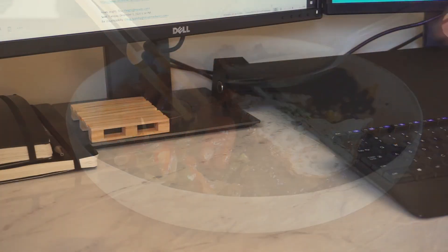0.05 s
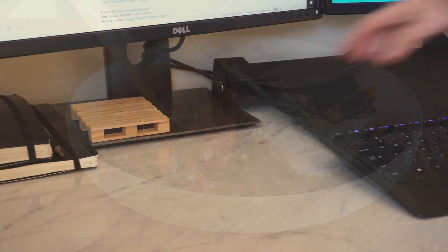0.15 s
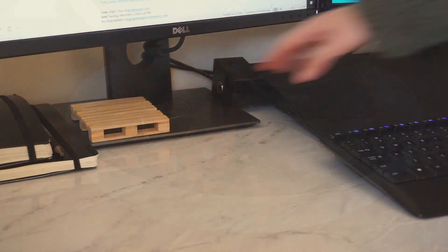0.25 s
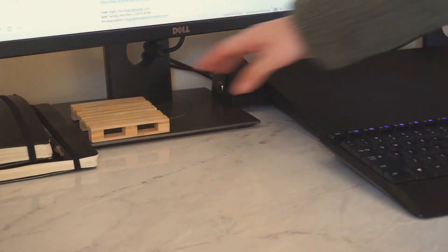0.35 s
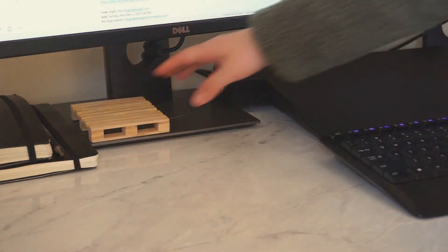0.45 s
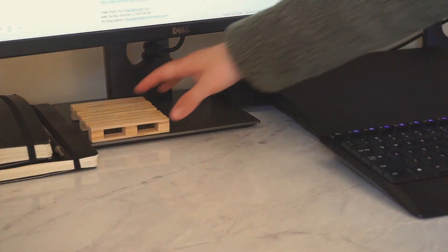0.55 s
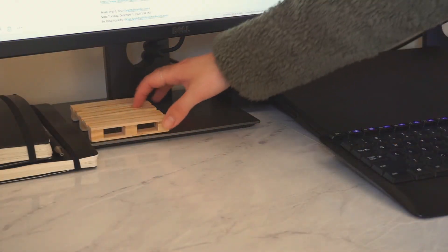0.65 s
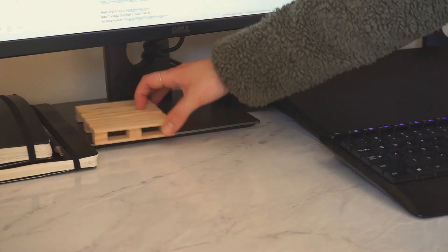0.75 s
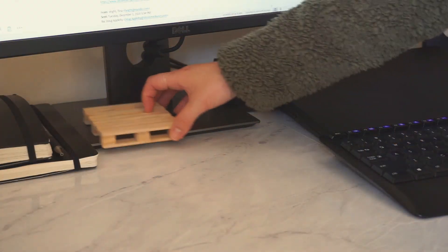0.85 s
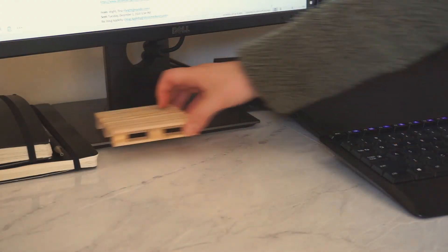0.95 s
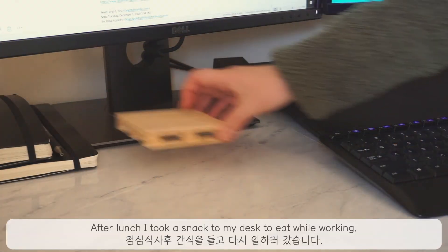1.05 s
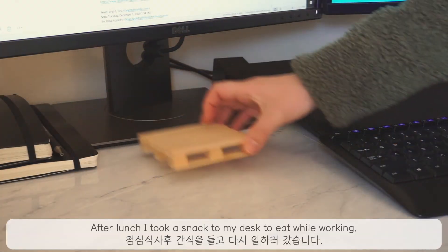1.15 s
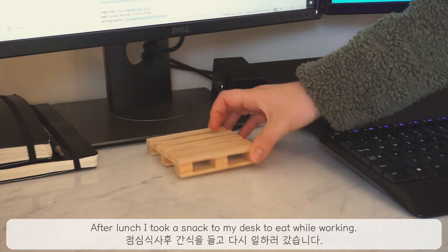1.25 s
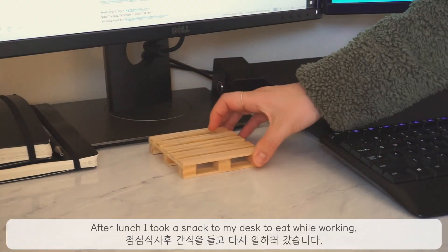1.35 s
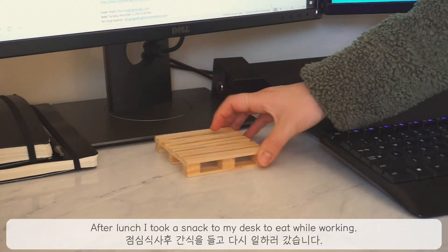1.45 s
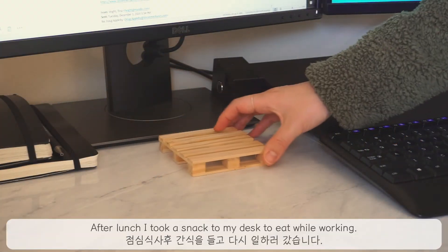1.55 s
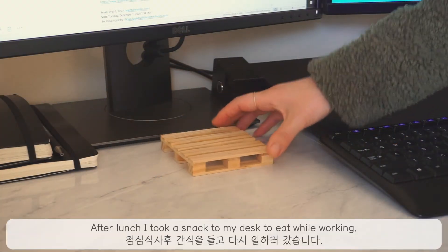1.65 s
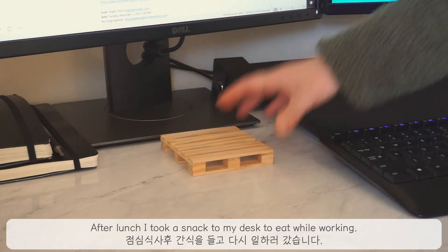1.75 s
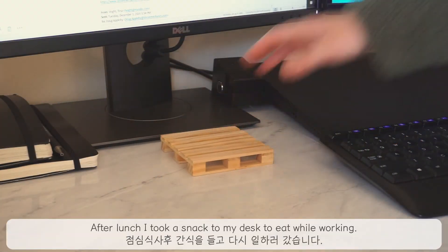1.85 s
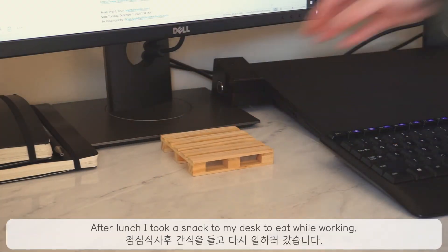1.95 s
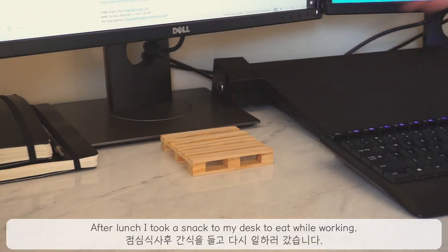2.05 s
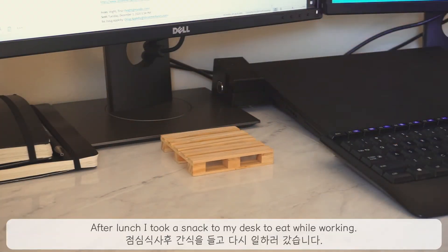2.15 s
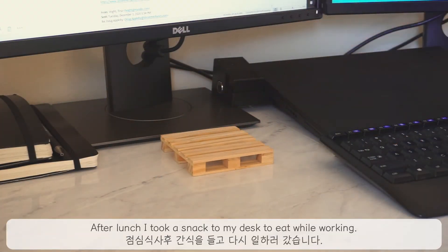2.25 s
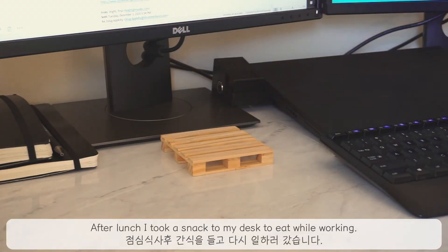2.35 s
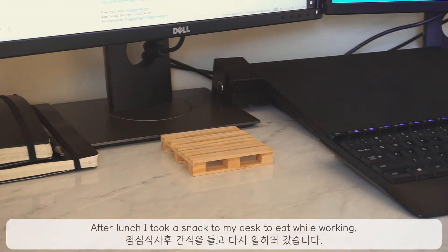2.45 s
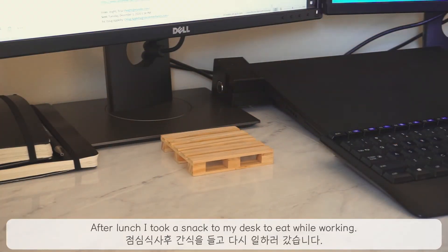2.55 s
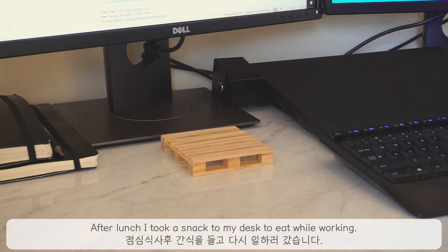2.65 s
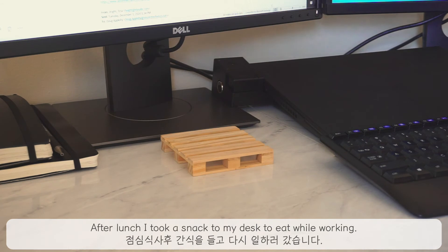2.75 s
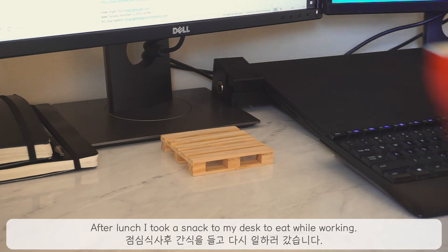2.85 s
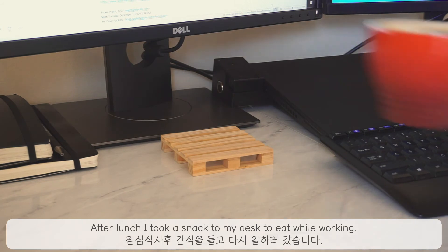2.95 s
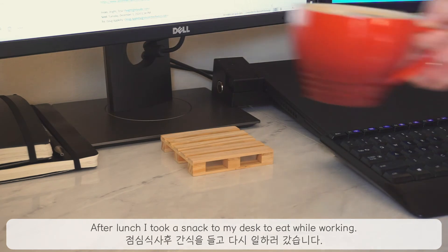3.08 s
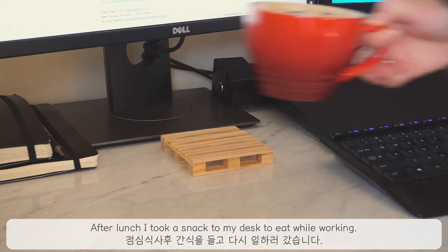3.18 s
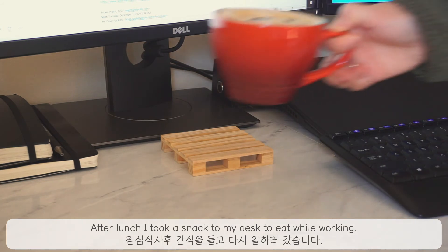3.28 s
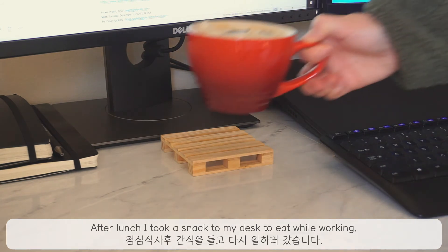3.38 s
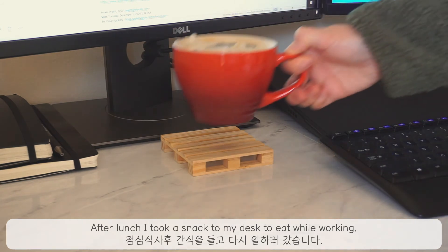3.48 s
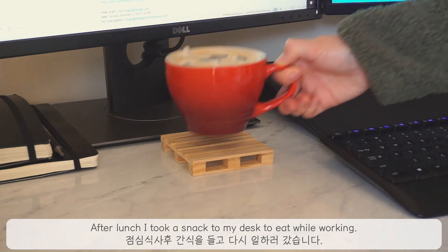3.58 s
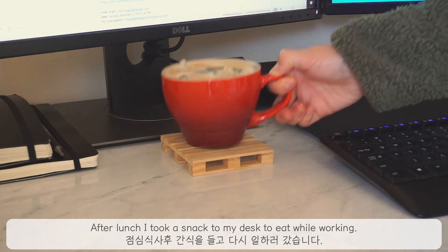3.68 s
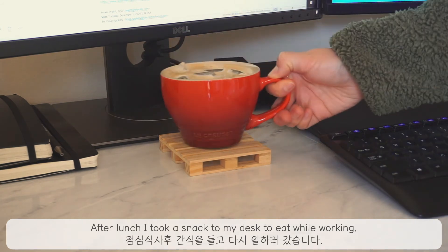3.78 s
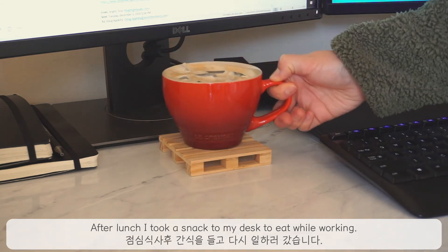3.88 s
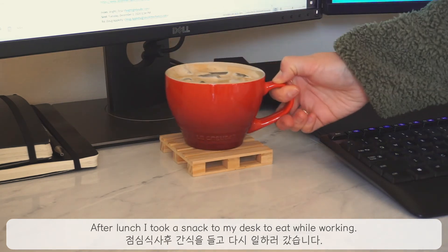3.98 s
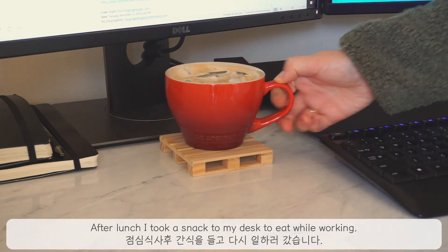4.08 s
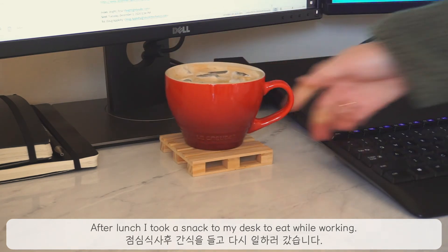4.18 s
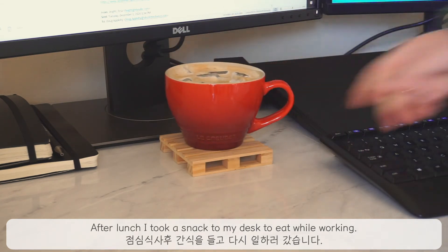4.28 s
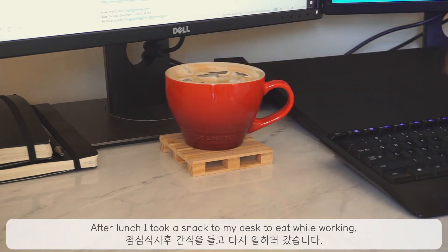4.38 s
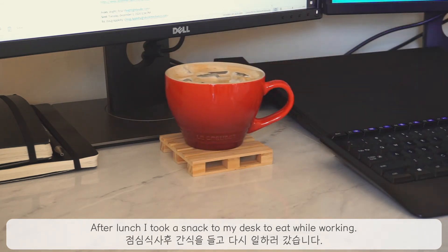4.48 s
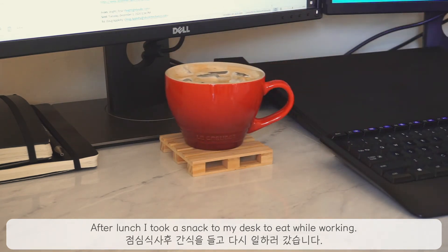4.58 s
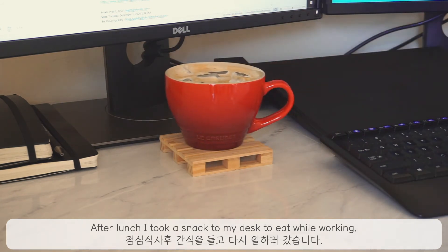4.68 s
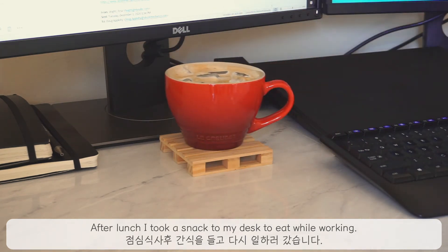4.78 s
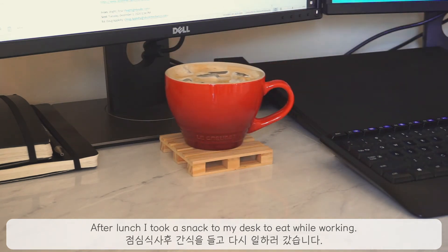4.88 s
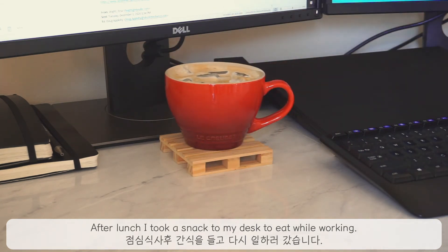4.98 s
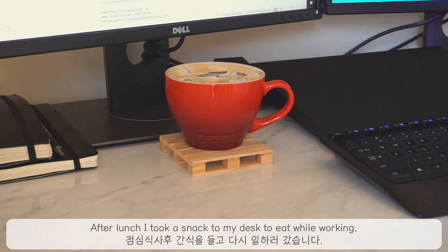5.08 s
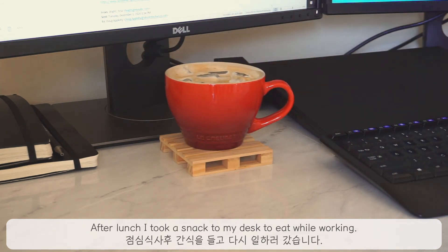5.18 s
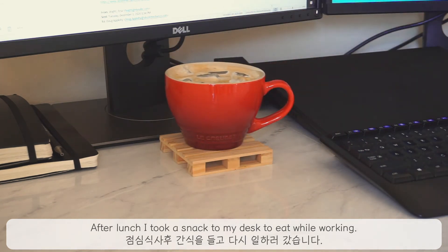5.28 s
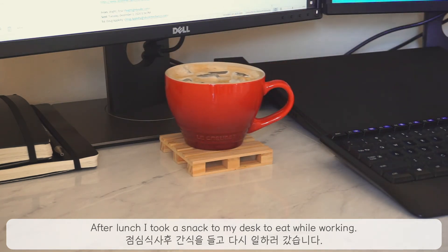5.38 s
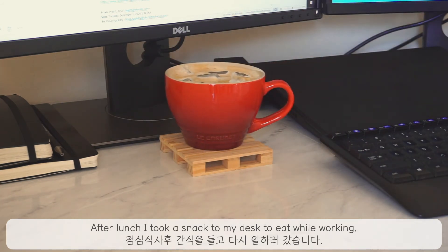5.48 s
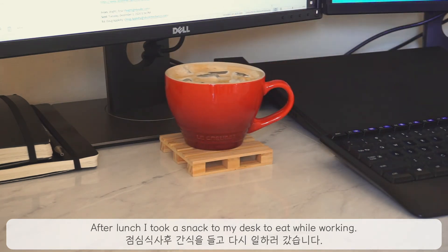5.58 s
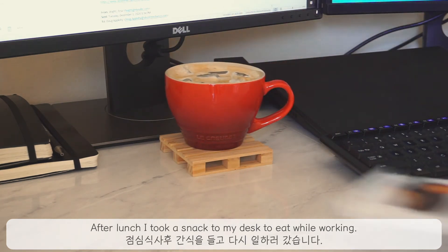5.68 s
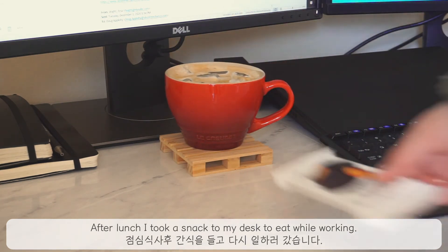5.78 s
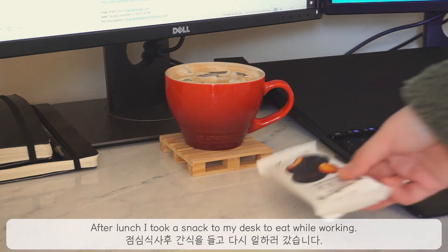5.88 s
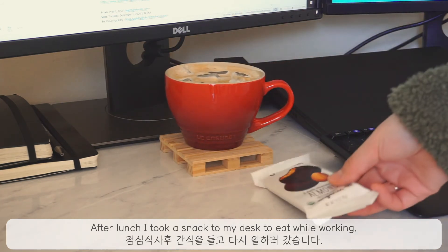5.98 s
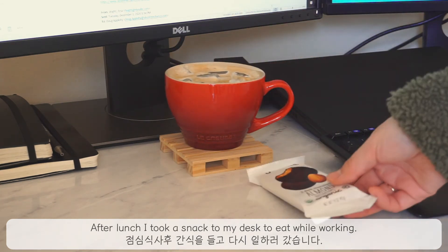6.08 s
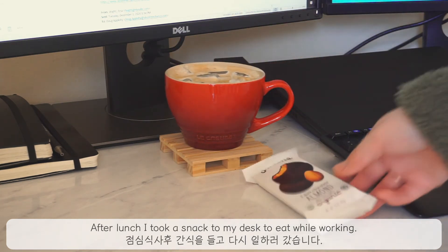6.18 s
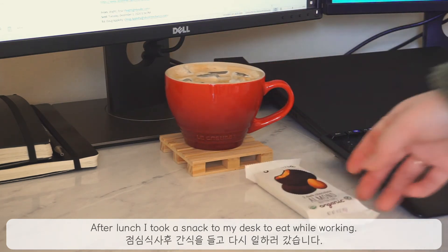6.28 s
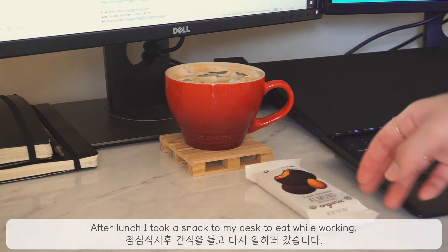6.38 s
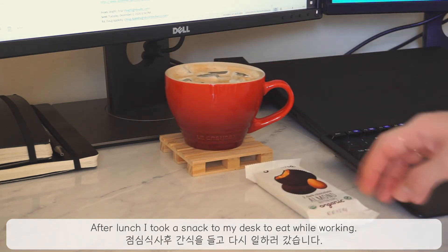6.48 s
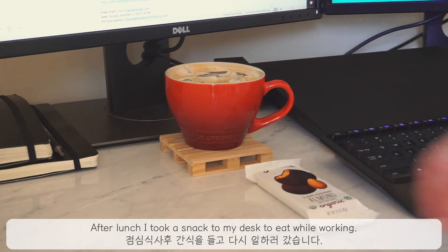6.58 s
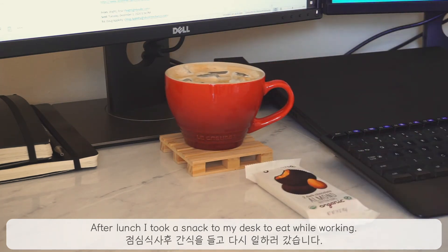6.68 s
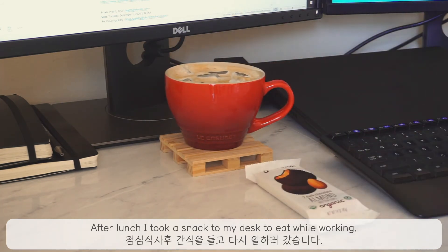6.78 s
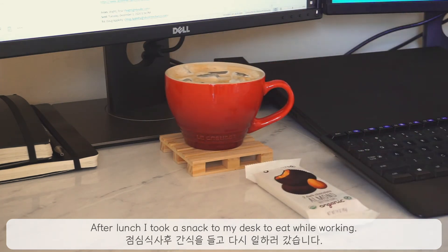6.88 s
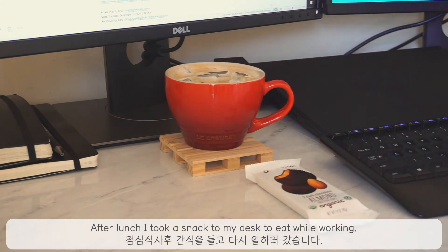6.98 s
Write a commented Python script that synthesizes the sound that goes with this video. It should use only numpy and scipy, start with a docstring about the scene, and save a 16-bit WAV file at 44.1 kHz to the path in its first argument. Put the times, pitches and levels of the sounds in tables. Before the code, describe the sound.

A small wooden coaster judders and scrapes off a monitor stand, then taps lightly down on a desk. After a pause with faint sleeve swishes, a full ceramic mug lands on it with a loud clack and a low boom from the desk top. A plastic snack wrapper crackles further off, comes close and drops with a soft thump. The stereo microphone is close, in a quiet room with low room tone.

```python
"""Coaster, mug and snack on a desk

Quiet room, stereo microphone close to the desk. Left of centre a small wooden coaster sticks and slips
off a monitor stand and is laid down. A full ceramic mug lands on it with a clack, and the desk top booms.
A snack is picked up further off, the creases of its plastic wrapper snapping; it comes close and is
dropped beside the mug. Underneath are low room tone and the swish of a fleece sleeve."""
import sys
import numpy as np
from scipy import signal
from scipy.fft import rfft, irfft
from scipy.io import wavfile

SR = 44100
rng = np.random.default_rng(int(sys.argv[2]) if len(sys.argv) > 2 else 0)


def int16_out(signal):
    """Quantize to a 16-bit WAV file."""
    q = np.round(np.clip(np.atleast_2d(signal).T, -1, 1) * 32767)
    wavfile.write(sys.argv[1], SR, q.astype(np.int16))


N = 310464
TIME = np.arange(N) / SR

# Levels are relative: each source has a gain of its own in the mix.
# contacts: t/s, level/dB, brightness/Hz, chatter/s
MUG_CLACKS = [(3.7385, -45, 2500, 0.008), (3.7425, -24, 9000, 0.0037), (3.7436, -17, 4000, 0.0013),
              (3.7465, -22.5, 1500, 0.0037)]  # the foot grazes, then meets the coaster
STAND_KNOCKS = [(0.7862, -17.5, 9000, 0.0092), (0.7905, -24.5, 1200, 0.01), (0.8165, -28.5, 1400, 0.0071),
                (0.8240, -27.5, 1000, 0.011), (0.9185, -35.5, 900, 0.019), (0.9480, -37, 600, 0.017)]  # coaster knocking on the stand
DESK_TAPS = [(1.2368, -34.5, 3000, 0.0022), (1.3365, -33.5, 3500, 0.0047), (1.3420, -39.5, 1600, 0.03)]  # coaster touching down
# weight arriving on the desk top: t/s, level/dB, contact/s, share of the full ringing time
DESK_THUMPS = [(0.7880, -22, 0.0018, 0.18), (1.3356, -28.5, 0.0018, 0.42), (2.435, -26.5, 0.0024, 0.84),
               (3.744, 3.5, 0.0034, 1), (3.9830, -18, 0.0022, 0.29), (4.242, -24.5, 0.0041, 0.43),
               (6.245, -20, 0.0012, 0.19), (6.302, -17, 0.00078, 0.3)]
# creases snapping and jolting the snack: t/s, snap level/dB, pitch/Hz, chatter/s, jolt level/dB
CREASE_SNAPS = [(4.252, -42, 3100, 0.0074, -65), (4.903, -37, 3800, 0.065, -45.5),
                (4.9740, -44.5, 2350, 0.036, -56), (5.3440, -49, 2300, 0.025, -58),
                (5.389, -25.5, 3400, 0.0082, -42.5), (5.6338, -35.5, 8500, 0.0045, -65),
                (5.7510, -43.5, 3100, 0.0084, -56), (5.7960, -53, 3520, 0.023, -40),
                (5.9786, -27.5, 3150, 0.005, -43), (5.9950, -12.5, 5350, 0.0028, -28),
                (6.1711, -20.5, 3700, 0.0061, -36), (6.2424, -25.5, 2780, 0.013, -45),
                (6.2980, -31.5, 3100, 0.015, -37.5), (6.3377, -36.5, 2900, 0.0046, -47)]

# resonances: f/Hz, width/Hz, level/dB
MUG_MODES = [(345, 130, -3), (694, 460, -6.5), (1040, 560, -2.5), (1780, 710, -1), (2520, 630, 2),
             (2800, 190, -16), (3750, 320, -11), (4720, 770, -5.5), (4930, 220, 2.5), (7100, 6000, -12)]
STAND_MODES = [(780, 63, -10), (947, 88, -2.5), (1030, 79, 4), (1214, 120, -5.5), (1516, 24, -4),
               (1730, 150, -9), (2040, 51, -9.5), (2410, 60, -13), (3100, 130, -17), (4700, 300, -22)]
COASTER_MODES = [(158, 74, 2), (360, 110, -4), (600, 57, 6), (760, 47, 2), (995, 113, 5), (1715, 270, 5),
                 (2440, 460, -1.5), (3360, 600, -6), (4700, 410, 0), (8500, 10000, -16.5)]
LAID_COASTER_MODES = [(130, 43, 3), (355, 26, 15), (548, 36, 2.5), (714, 100, 2), (1130, 140, 3.5),
                      (1590, 320, 1.5), (2300, 500, -4), (6630, 8300, -10)]  # resting on the desk
SNACK_MODES = [(178, 83, -10), (363, 280, -11), (576, 250, -1), (814, 96, 0.5), (1144, 110, 4),
               (1420, 260, -2)]
# ringing of the desk top: f/Hz, level/dB, t60/s
DESK_MODES = [(77, -44.5, 0.97), (93, -58, 0.45), (124.54, -21, 0.56), (130, -72, 0.095),
              (138.2, -28, 0.46), (155.7, -31.5, 0.33), (202, -45.5, 0.95), (249.3, -46.5, 1),
              (350, -37.5, 0.38), (374, -29.5, 0.23), (472, -32.5, 0.68)]
# resonances of a crease: multiple of its pitch, width as a share of the frequency, level/dB
CREASE_MODES = [(.3, 0.23, -1), (.66, 0.4, 0.5), (1, 0.25, 3), (1.3, 0.31, -0.5), (1.9, .35, -3.5),
                (2.8, 1, -7.5)]

# hand and arm movements: peak t/s, level/dB, rise/s, fall/s
COASTER_PULLS = [(0.69, -46.5, 0.0083, 0.021), (0.768, -43.5, 0.031, 0.053), (0.882, -41, 0.043, 0.073)]  # wood sliding over the stand
WRAPPER_RUBS = [(4.245, -52.5, 0.008, 0.012), (5.60, -55, 0.038, 0.018), (5.71, -55.5, 0.012, 0.019),
                (5.808, -49, 0.025, 0.017), (6.047, -45, 0.015, 0.015), (6.217, -38, 0.014, 0.015),
                (6.288, -41.5, 0.03, 0.024)]  # on fingers and desk
SLEEVE_SWISHES = [(0.32, -61.5, 0.35, 0.57), (1.05, -63.5, 0.32, 0.68), (2.38, -60.5, 0.24, 0.22),
                  (2.93, -58.5, 0.13, 0.073)]
SLEEVE_BRUSHES = [(0.28, -63, 0.35, 0.4), (2.32, -63, 0.22, 0.21), (2.84, -55.5, 0.071, 0.19),
                  (2.978, -51, 0.04, 0.057)]  # fleece against itself

# noise spectra: f/Hz, level/dB
SCRAPE_SPECTRUM = [(100, -27), (500, -2), (1000, 3), (2000, 1.5), (3200, -3), (5000, -1), (7500, -4.5),
                   (11000, -1.5)]
RUSTLE_SPECTRUM = [(200, -9), (1000, -13.5), (2000, -4.5), (3500, -5), (5500, -7), (8000, -9.5),
                   (11000, -8.5)]
SWISH_SPECTRUM = [(120, -3), (300, 0), (550, 2), (900, -2), (2000, -8.5), (5000, -21), (11000, -32)]
BRUSH_SPECTRUM = [(150, -6), (1800, 0.5), (2450, 4), (3200, -1), (7000, -3), (11000, -3)]
ROOM_TONE_SPECTRUM = [(11, -19), (18, -4.5), (59, -1.5), (93, -13), (124, -10.5), (146, -19), (278, -18),
                      (374, -19.5), (405, -22.5), (559, -19), (931, -24.5), (1250, -24), (1360, -25),
                      (7760, -33.5), (11000, -34.5), (14300, -141), (22000, -120)]
# room echo: f/Hz, level/dB, t60/s
ECHO_BANDS = [(94, -6.5, 0.9), (300, 9.5, 0.37), (696, 2, 0.56), (2000, -1.5, 0.4), (5000, 0, 0.46),
              (11100, -9, 0.85)]
# left-right correlation of the echo and of the background: f/Hz, correlation (-1..1)
ECHO_CORRELATION = [(130, 0.88), (300, 0.58), (600, 0.61), (1100, 0.0083), (2000, 0.16), (5000, 0),
                    (11000, 0.34)]
AIR_CORRELATION = [(40, 1), (130, 0.85), (280, 0.14), (550, -0.15), (1000, -0.44), (2000, -0.34),
                   (5000, -0.14), (11000, 0.034)]


def mug(echo):
    """Close, a little left: the full mug clacks, then rocks to rest, each time softer and duller."""
    start_s, gap_s, chatter_s = 3.784, 0.098, 0.036
    first_db, loss_db, bright_hz, dulling = -35, 8, 14000, 0.6
    rocks = [(start_s + k * gap_s, first_db - k * loss_db, bright_hz * dulling ** k, chatter_s)
             for k in range(3)]
    contacts = strikes(MUG_CLACKS + rocks, MUG_MODES, chatter=1, spot_db=2)
    return place(amp(4.5) * contacts, echo, pan_db=3.5, side_db=-6, room_db=-2)


def desk(echo):
    """Centre, nearly dry: half-sine pushes ring the desk top; the heavy mug makes it boom longest."""
    t, out = TIME[:SR], np.zeros(N)
    choke = amp(-130 * np.maximum(t - 0.24, 0))  # friction stops the last faint swings
    for s, db, contact_s, share in DESK_THUMPS:
        push = np.sin(np.pi * np.minimum(t / contact_s, 1))
        ring = sum(amp(level - 60 * t / (t60 * share)) * np.sin(2 * np.pi * hz * t)
                   for hz, level, t60 in DESK_MODES)
        add(out, s, amp(db) * signal.fftconvolve(push / push.sum(), ring * choke))
    low_cut = signal.butter(2, 62, "high", fs=SR, output="sos")  # a board radiates no slow motion
    return place(signal.sosfilt(low_cut, out), echo, pan_db=-0.2, side_db=-20, room_db=-13)


def coaster(echo):
    """On the left: the wood judders, slides off the stand and is laid on the desk."""
    lift_off_s, fade_s = 0.96, 0.005
    judder = strikes(slips(), STAND_MODES, chatter=0.45, spot_db=2)
    touching = np.exp(-np.maximum(TIME - lift_off_s, 0) / fade_s)
    slide = strokes(COASTER_PULLS) * touching * grains(SCRAPE_SPECTRUM, per_s=6200, spread_db=3)
    knocks = strikes(STAND_KNOCKS, COASTER_MODES, chatter=0.9, spot_db=1.7)
    taps = strikes(DESK_TAPS, LAID_COASTER_MODES, chatter=0.43, spot_db=2.5)
    return (place(amp(-3.5) * judder, echo, pan_db=7, side_db=-1, room_db=-1)
            + place(amp(1) * (slide + knocks + taps), echo, pan_db=5, side_db=-7, room_db=-4.5))


def slips(count=9):
    """Stick-slip contacts, nearly regular, that dull as the wood moves and weaken as it breaks free."""
    start_s, gap_s, jitter_s, chatter_s = 0.6845, 0.0085, 0.00131, 0.007
    grip_db, loss_db, spread_db = -23, 11, 1.5
    grip_s, release_s, bright_hz, dulling_s = 0.035, 0.012, 3800, 0.018
    rows = []
    for k, (late, strong) in enumerate(rng.standard_normal((count, 2))):
        age = k * gap_s
        free = np.clip((age - grip_s) / release_s, 0, 1)
        db = grip_db - loss_db * free + spread_db * strong
        rows.append((start_s + age + jitter_s * late, db, bright_hz / (1 + age / dulling_s), chatter_s))
    return rows


def snack(echo):
    """The wrapper crackles and jolts the snack, first further off with more room, then close by."""
    jolt_cycles, jolt_chatter_s = 8.6, 0.009  # a briefer snap gives a brighter jolt
    jolts = [(s, db, jolt_cycles / snap_s, jolt_chatter_s) for s, _, _, snap_s, db in CREASE_SNAPS]
    crackle = amp(2) * crinkles(bright_hz=13900, chatter=1.72)
    rattle = amp(-1.5) * strikes(jolts, SNACK_MODES, chatter=1, spot_db=3)
    sound = crackle + rattle + rustle()
    close = np.interp(TIME, [5.85, 5.95], [0, 1])
    return (place(sound * (1 - close), echo, pan_db=-0.5, side_db=0, room_db=-1.5)
            + place(amp(-0.5) * sound * close, echo, pan_db=3, side_db=-4.5, room_db=-5))


def crinkles(bright_hz, chatter):
    """Each crease has a size, and so a pitch; it buckles, then springs back softer and lower."""
    rebound_s, rebound_loss_db, rebound_ratio = 0.0097, 11.5, 0.83
    out = np.zeros(N)
    for s, db, pitch, chatter_s, _ in CREASE_SNAPS:
        for delay, loss_db, hz in ((0, 0, pitch), (rebound_s, rebound_loss_db, pitch * rebound_ratio)):
            modes = [(k * hz, k * hz * width, level)
                     for k, width, level in CREASE_MODES if k * hz < SR / 2]
            add(out, s + delay, strike(db - loss_db, bright_hz, chatter_s, modes, chatter))
    return out


def rustle():
    """The wrapper rustles finely as it is held and rubbed, bends before each snap and settles after."""
    from_s, until_s, far_db, near_db = 4.9, 6.33, -65.5, -61.5
    bend_s, settle_s, flex_db, snap_share = 0.0084, 0.057, -38.5, 0.47
    in_hand = (TIME > from_s) & (TIME < until_s)
    held = amp(np.interp(TIME, [from_s, until_s], [far_db, near_db])) * in_hand
    gains = [held, strokes(WRAPPER_RUBS)]
    for s, db, *_ in CREASE_SNAPS:
        flex = np.exp(-np.abs(TIME - s) / np.where(TIME < s, bend_s, settle_s))
        gains.append(amp(flex_db + snap_share * db) * flex)
    return np.linalg.norm(gains, axis=0) * grains(RUSTLE_SPECTRUM, per_s=4000, spread_db=2)


def sleeve():
    """Faint and wide: fleece swishes as the arm moves and brushes against itself."""
    swish = coloured(diffuse(N, AIR_CORRELATION), SWISH_SPECTRUM)
    brush = coloured(diffuse(N, AIR_CORRELATION), BRUSH_SPECTRUM)
    return strokes(SLEEVE_SWISHES) * swish + strokes(SLEEVE_BRUSHES) * brush


def room_tone():
    """Steady low rumble and hiss from all round the microphone."""
    return amp(-55.51) * coloured(diffuse(N, AIR_CORRELATION), ROOM_TONE_SPECTRUM)


def room_echo(build_s):
    """The room's diffuse echo builds quickly and dies at its own rate in each octave."""
    size = 2 ** 15
    t, hz = TIME[:size], np.fft.rfftfreq(size, 1 / SR)
    noise, out = rfft(diffuse(size, ECHO_CORRELATION)), 0
    for centre in 62.5 * 2 ** np.arange(9):
        share = np.maximum(1 - np.abs(np.log2(np.maximum(hz, 1) / centre)), 0)
        band = amp(at_hz(ECHO_BANDS, centre)) * irfft(noise * share, size)
        t60 = at_hz(ECHO_BANDS, centre, column=2)
        decay = amp(-60 * t / t60) * (1 - np.exp(-t / build_s))
        out = out + band * decay / np.linalg.norm(decay)
    return out


def place(x, echo, pan_db, side_db, room_db, scatter_s=0.002):
    """At the microphone: direct sound, treble scattered sideways by things on the desk, and the room."""
    t = TIME[:echo.shape[1]]
    burst = rfft(rng.standard_normal(len(t)) * np.exp(-t / scatter_s))
    smear = irfft(burst / np.abs(burst), len(t)) * (t < 10 * scatter_s)  # spread in time, uncoloured
    scatter = signal.lfilter(*signal.butter(1, 1500, "high", fs=SR), smear)
    pan = amp([[pan_db / 2], [-pan_db / 2]])  # positive is left
    paths = amp(side_db) * scatter * [[1], [-1]] + amp(room_db) * echo * np.sqrt(pan)
    direct = np.array([np.roll(x, 1), x])  # the right capsule is a little nearer
    return direct * pan + signal.fftconvolve(x[None], paths, axes=1)[:, :N]


def strikes(events, modes, chatter, spot_db):
    """Each contact meets the body at another spot and shares its force differently among the modes."""
    out = np.zeros(N)
    for s, db, bright_hz, chatter_s in events:
        excited = [(hz, width, level + spot_db * rng.standard_normal()) for hz, width, level in modes]
        add(out, s, strike(db, bright_hz, chatter_s, excited, chatter))
    return out


def strike(db, bright_hz, chatter_s, modes, chatter):
    """A pulse and a dying spray of micro-contacts, dulled by the contact's softness, ring a body."""
    t = TIME[:SR // 8]
    pulse = 1. * (t == 0)
    spray = rng.standard_normal(len(t)) * rng.exponential(1, len(t)) * np.exp(-2 * t / chatter_s)
    contact = pulse + chatter * spray * np.sqrt(1000 / SR)
    pole = np.exp(-2 * np.pi * bright_hz / SR)
    sound = resonate(signal.lfilter([1 - pole], [1, -pole], contact), modes)
    ring = resonate(pulse, modes)
    # longer chatter carries more energy at the same height
    energy = (1 + chatter * chatter_s * 100) * np.sum(ring ** 2) / np.max(ring ** 2)
    return amp(db) * sound * np.sqrt(energy / np.sum(sound ** 2))


def resonate(x, modes):
    """A body's resonances ring in parallel, with alternating sign."""
    out = 0
    for k, (hz, width, db) in enumerate(modes):
        radius = np.exp(-np.pi * width / SR)
        gain = (-1) ** k * amp(db) * (1 - radius ** 2) / 2
        feedback = [1, -2 * radius * np.cos(2 * np.pi * hz / SR), radius ** 2]
        out = out + signal.lfilter([gain, 0, -gain], feedback, x + 1e-18)
    return out


def grains(spectrum, per_s, spread_db):
    """Friction as a dense rain of tiny clicks of uneven size; rms 1."""
    sizes = amp(spread_db * np.minimum(rng.exponential(1, N), 4)) * rng.choice([-1, 1], N)
    return coloured(sizes * (rng.random(N) < per_s / SR), spectrum)


def strokes(rows):
    """Gain over time of hand movements, each a smooth rise and fall, summed in power."""
    gains = [amp(db) * np.exp(-((TIME - s) / np.where(TIME < s, rise, fall)) ** 2)
             for s, db, rise, fall in rows]
    return np.linalg.norm(gains, axis=0)


def diffuse(size, correlation):
    """White stereo noise from all sides: alike in the bass, less so higher up."""
    mid, side = rfft(rng.standard_normal((2, size)))
    alike = np.clip(at_hz(correlation, np.fft.rfftfreq(size, 1 / SR)), -0.995, 0.995)
    left_right = np.sqrt(1 + alike) * mid + np.sqrt(1 - alike) * side * [[1], [-1]]
    return irfft(left_right / np.sqrt(2), size)


def coloured(x, spectrum):
    """Give noise a smooth spectrum; rms 1."""
    shaped = irfft(rfft(x) * amp(at_hz(spectrum, np.fft.rfftfreq(N, 1 / SR))), N)
    return shaped / np.std(shaped)


def at_hz(table, hz, column=1):
    """One column of a table, read on a log-frequency axis."""
    table = np.array(table)
    return np.interp(np.log(np.maximum(hz, 1)), np.log(table[:, 0]), table[:, column])


def add(track, s, sound):
    """Mix a short sound into a track at time s."""
    start = int(round(s * SR))
    track[start:start + len(sound)] += sound[:N - start]


def amp(db):
    """Decibels to gain."""
    return 10 ** (np.asarray(db) / 20)


def scene():
    """Everything on the desk shares one room and one microphone position."""
    echo = room_echo(build_s=0.0021)
    return coaster(echo) + mug(echo) + desk(echo) + snack(echo) + room_tone() + sleeve()


def record(dry):
    """The top treble is cut steeply."""
    cutoff_hz = 11150
    return signal.sosfilt(signal.ellip(10, 0.1, 60, cutoff_hz, fs=SR, output="sos"), dry)


dry = scene()
out = record(dry)
int16_out(out)
```